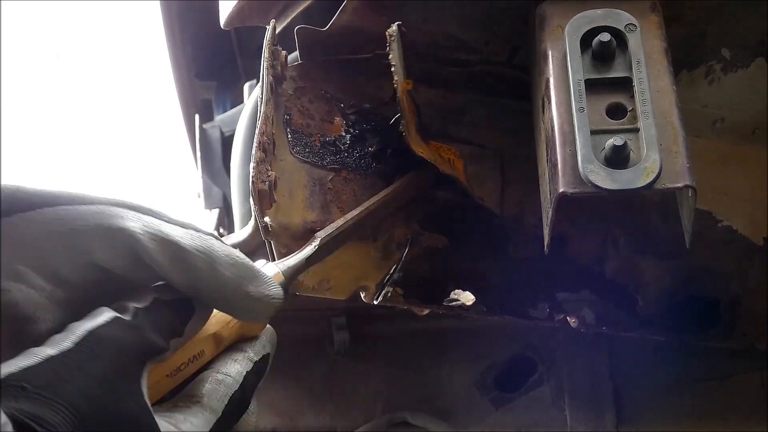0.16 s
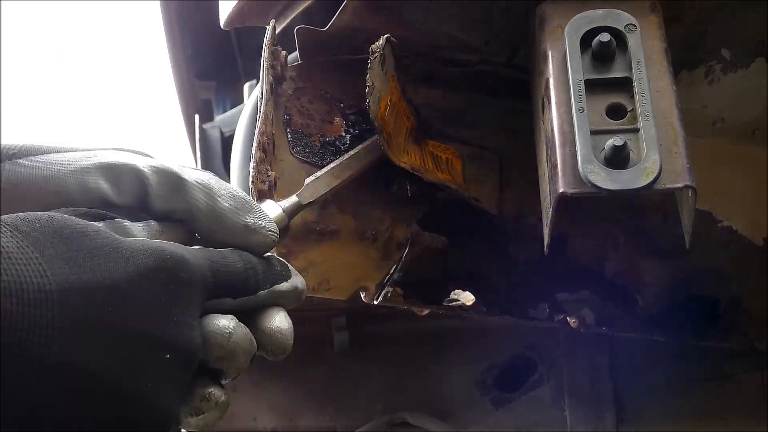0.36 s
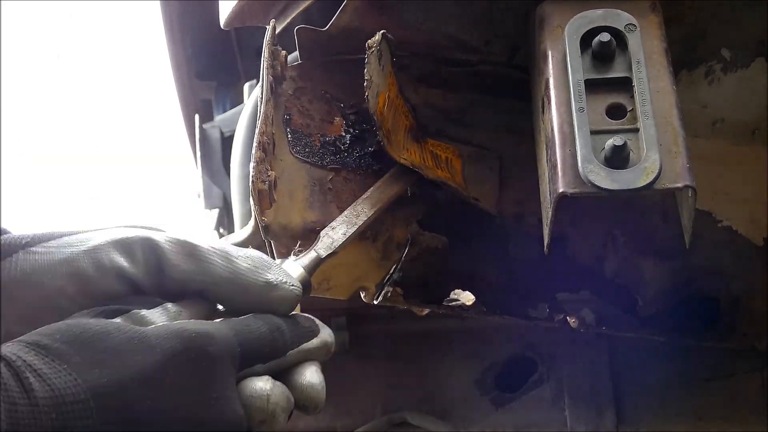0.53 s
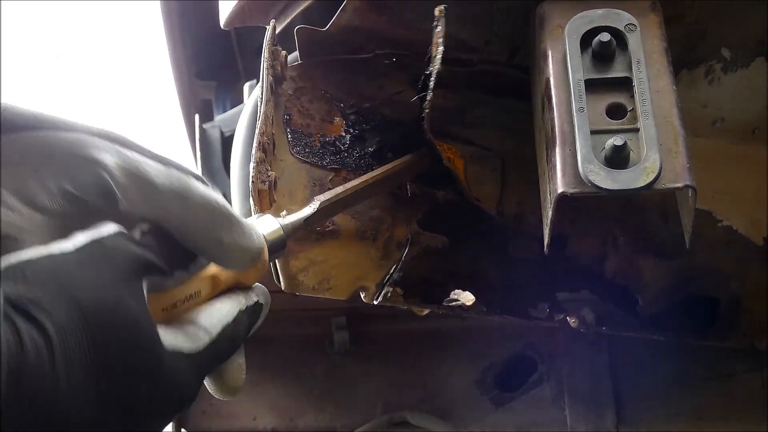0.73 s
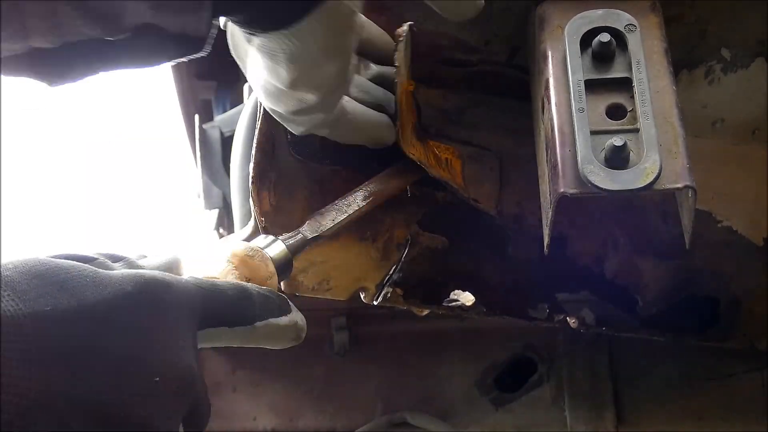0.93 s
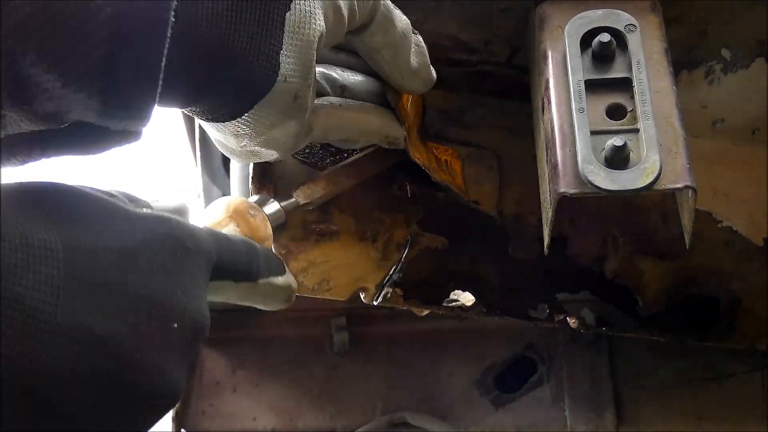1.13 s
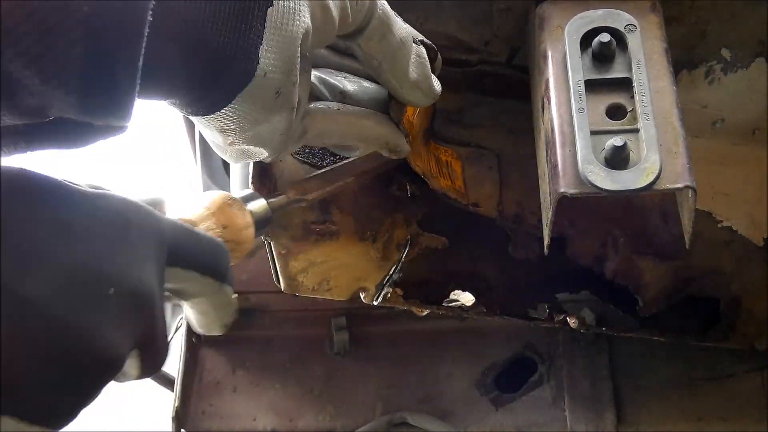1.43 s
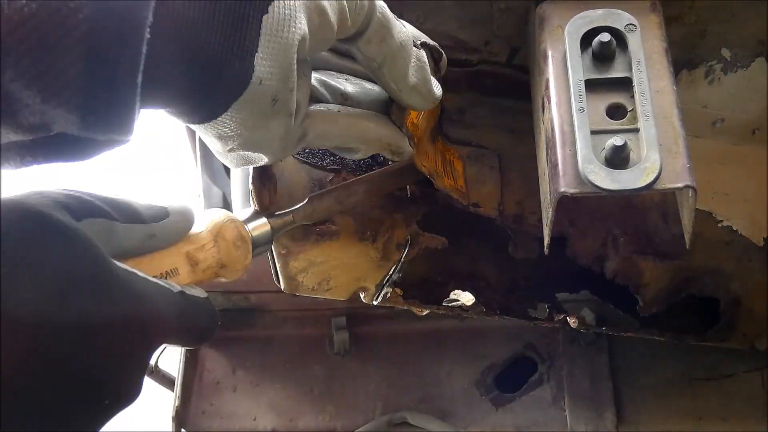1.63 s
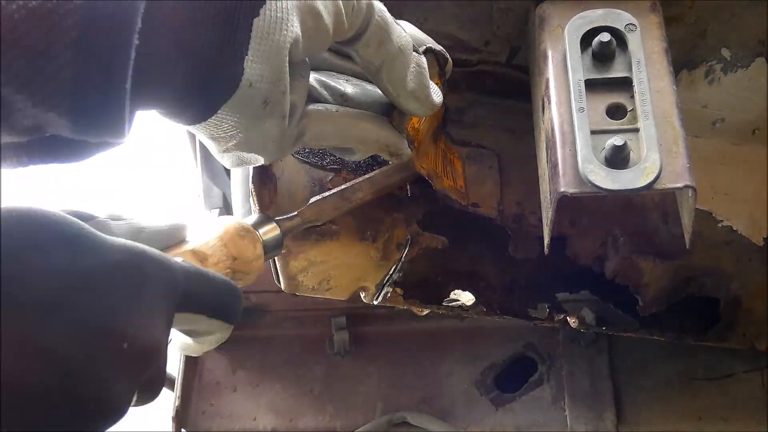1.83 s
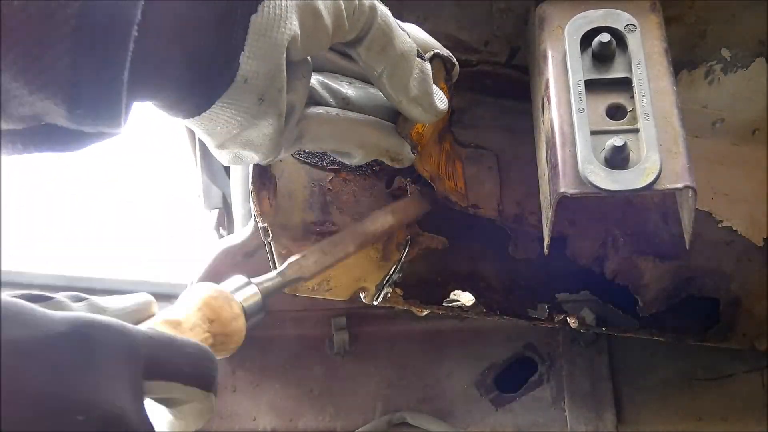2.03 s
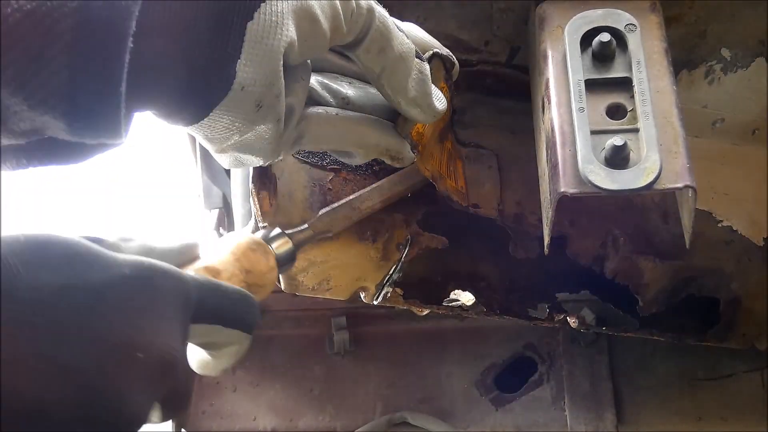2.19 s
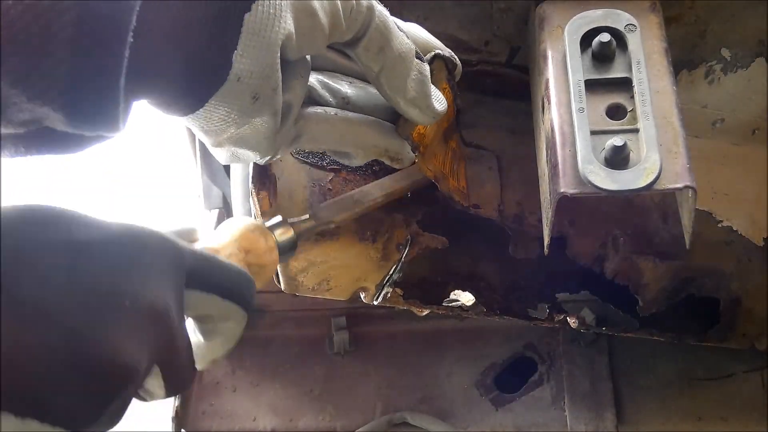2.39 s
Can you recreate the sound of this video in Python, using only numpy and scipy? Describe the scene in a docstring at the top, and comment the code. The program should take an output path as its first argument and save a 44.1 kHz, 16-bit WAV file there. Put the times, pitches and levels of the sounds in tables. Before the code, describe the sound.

A steel blade scrapes rust from sheet metal under a car, an arm's length away. Gritty strokes and scattered snaps build to a louder crunching run with sharp clicks, then thin out, in a quiet workshop.

```python
"""A steel blade prises and scrapes rust off the sheet metal under a car, an arm's length away.
Flakes snap off singly and in crunching runs; each snap rings the blade and the dull, damped panel.
Between them the tip grinds through grit, clicks on bare steel and sings as it drags. Firmer pushes
knock the hollow sheet and a glove rubs the metal, over the faint rush of a quiet workshop."""
import sys
import numpy as np
from scipy import signal
from scipy.fft import rfft, irfft
from scipy.io import wavfile

SR = 44100
rng = np.random.default_rng(int(sys.argv[2]) if len(sys.argv) > 2 else 0)


def to_wav(sig):
    """Store sig (one row per channel, or 1-D mono) as 16-bit WAV at the path in sys.argv[1].

    Samples outside -1..1 are clipped; the rate is SR.
    """
    pcm = np.clip(np.atleast_2d(sig), -1, 1) * 32767
    pcm = np.round(pcm).astype(np.int16)
    wavfile.write(sys.argv[1], SR, pcm.T)  # frames by channels


N = 112454
TIME = np.arange(N) / SR
HIT_GAIN = np.sqrt(SR / 100)  # gives a unit-energy hit the energy of 10 ms at 0 dB
SIDEWAYS = np.array([[1], [-1]])  # plus on the left, minus on the right


def undb(db):
    """Decibels to gain."""
    return 10 ** (np.asarray(db) / 20)


def unit(x):
    """Scale to an energy of one."""
    return x / np.sqrt(np.sum(x ** 2) + 1e-18)


def level(x, db):
    """Scale to an rms level."""
    return x * undb(db) / np.sqrt(np.mean(x ** 2))


def band(x, lo_hz, hi_hz, order=3):
    """Causal band-pass."""
    return signal.sosfilt(signal.butter(order, [lo_hz, hi_hz], "band", fs=SR, output="sos"), x)


def dull(x, hz):
    """One-pole low-pass."""
    pole = np.exp(-2 * np.pi * hz / SR)
    return signal.lfilter([1 - pole], [1, -pole], x)


def ring(x, response):
    """Pass a signal through an impulse response."""
    return signal.fftconvolve(x, response)[:len(x)]


def decay(t, t60_s):
    """A tail that falls 60 dB in t60_s."""
    return np.exp(-np.log(1000) * t / t60_s)


def walk(per_s):
    """Smooth random wandering with a spread near one."""
    return 1.2 * np.interp(TIME * per_s, np.arange(2000), rng.standard_normal(2000))


def gate(start, length, ramp_s=0.01):
    """Opens for a stroke, with a short ramp at each end."""
    return np.clip(np.minimum(TIME - start, start + length - TIME) / ramp_s + 0.5, 0, 1)


def add(out, x, start_s):
    """Mix a sound in at a time."""
    i = max(int(start_s * SR), 0)
    out[i:i + len(x)] += x[:max(N - i, 0)]


# The colour of the room tone. Each row: frequency in Hz, relative level in dB.
ROOM_TONE = [(30, -34), (90, -22.5), (160, -16), (250, -5.5), (450, 1), (800, -1.5), (1500, 1.5),
             (2000, -9), (4500, -7), (5500, -12), (16000, -21)]
def workshop(bed_db=-50.5, side_db=-7, waver_db=2.16):
    """A faint, slightly wavering rush sits under everything."""
    hz, db = np.array(ROOM_TONE).T
    colour = undb(np.interp(np.log(np.fft.rfftfreq(N, 1 / SR) + 1), np.log(hz), db))
    mid, side = (level(irfft(rfft(rng.standard_normal(N)) * colour, N), bed_db) for _ in range(2))
    return (mid + undb(side_db) * side * SIDEWAYS) * undb(waver_db * walk(per_s=26))


def reflections(x, t60_s, fade_in_s=0.0018, size=20000):
    """Diffuse echoes build just behind the sound and die away."""
    t = np.arange(size) / SR
    tail = rng.standard_normal(size) * np.clip(t / fade_in_s, 0, 1) * decay(t, t60_s)
    return ring(x, unit(tail))


# The glove brushing the panel. Each row: start in seconds, length in seconds, peak level in dB.
GLOVE_RUBS = [(0.386, 0.076, -53.5), (0.887, 0.049, -48), (1.899, 0.036, -51.5)]
def glove():
    """Soft, low rubs of the gloved hand against the panel."""
    pressure = sum(undb(db) * np.sin(np.pi * np.clip((TIME - start) / length, 0, 1))
                   for start, length, db in GLOVE_RUBS)
    rub = band(rng.standard_normal(N), lo_hz=260, hi_hz=620)
    return pressure * level(rub, 0)


def struck_steel(modes, click_db, spread_db=3, size=6000):
    """Steel answers a tap with a click and decaying modes; each place of contact favours other modes."""
    t = np.arange(size) / SR
    tone = np.zeros(size)
    for hz, db, t60 in modes:
        gain = undb(db + spread_db * rng.uniform(-0.74, 1))
        tone += gain * unit(np.cos(2 * np.pi * hz * t) * decay(t, t60))
    return unit(tone) + undb(click_db) * (t == 0)


# The modes that sing. Each row: pitch in Hz, relative level in dB, 60 dB decay time in seconds.
SINGING_MODES = [(4657, 15, 0.018), (4700, -7, 0.032), (4790, -7, 0.076)]
# The drags that set them off. Each row: start in seconds, length in seconds, level in dB.
SINGING_DRAGS = [(0.082, 0.013, -40), (2.04, 0.0066, -27.5), (2.159, 0.012, -27.5), (2.211, 0.039, -42.5)]
def singing():
    """Friction keeps a close group of the blade's modes ringing."""
    friction = rng.standard_normal(N)
    tone = level(ring(friction, struck_steel(SINGING_MODES, click_db=-26)), 0)
    return tone * sum(undb(db) * gate(start, length) for start, length, db in SINGING_DRAGS)


# Hollow knocks. Each row: start in seconds, level in dB, pitch in Hz, 60 dB decay time in seconds.
SHEET_KNOCKS = [(1.11, -39, 967, 0.12), (1.535, -39, 947, 0.051), (2.264, -38.5, 517, 0.15),
                (2.468, -40, 517, 0.23)]
def knocks(size=6000):
    """A firmer push sets one hollow mode of the sheet swelling and ringing."""
    out, t = np.zeros(N), np.arange(size) / SR
    for start, db, hz, t60 in SHEET_KNOCKS:
        swell = 1 - np.exp(-(t * hz / 2) ** 2)
        tone = np.sin(2 * np.pi * hz * t) * decay(t, t60) * swell
        add(out, HIT_GAIN * undb(db) * unit(tone), start)
    return out


# Hard clicks. Each row: peak time in seconds, level in dB, pitch in Hz, attack in seconds.
TIP_CLICKS = [(0.022, -35.5, 1474, 0.0026), (0.039, -34, 4100, .0014), (0.4273, -34, 2200, 0.00096),
              (0.6416, -41.5, 4650, 0.0014), (1.1025, -38, 4390, 0.0016), (1.2415, -29, 3820, .0007),
              (1.467, -33, 3610, 0.00072), (1.8922, -26, 3530, 0.00073), (1.892, -25.5, 6640, .0003),
              (1.982, -29, 4060, .001), (1.9903, -23.5, 3900, .0008), (1.9951, -23.5, 3950, 0.001115),
              (2.122, -28.5, 4440, .001), (2.1298, -28, 5760, 0.00027), (2.309, -26.5, 4710, 0.0014),
              (2.4196, -35, 4690, 0.0011), (2.4686, -34.5, 3570, .0008)]
def clicks(size=1500):
    """The tip hits bare steel: a few cycles that swell and die at once."""
    out, t = np.zeros(N), np.arange(size) / SR
    for peak, db, hz, attack in TIP_CLICKS:
        envelope = (t / attack) ** 2 * np.exp(-2 * t / attack)
        burst = envelope * np.sin(2 * np.pi * (hz * t + rng.random()))
        add(out, HIT_GAIN * undb(db) * unit(burst), peak - attack)
    return out


# The dull panel's modes. Each row: pitch in Hz, relative level in dB, 60 dB decay time in seconds.
PANEL_MODES = [(517, 0.5, 0.075), (624.5, -1.5, 0.18), (947, 2, 0.034), (1036, -5, 0.055),
               (1273, -7.5, 0.028), (1516, 6.5, 0.045), (1606, -4, 0.038), (1808, 0.5, 0.053),
               (1995, -2, 0.045), (2176, 6, 0.0097), (2309, -3.5, 0.056), (2790, 0, 0.055),
               (2714, 0, 0.028)]
# The bright blade's modes. Each row: pitch in Hz, relative level in dB, 60 dB decay time in seconds.
BLADE_MODES = [(3098, -1, 0.044), (3374, 0, 0.015), (3526, -1, 0.026), (3910, -2, 0.034),
               (4100, 4.5, 0.025), (4130, -3.5, 0.0035), (4690, 5, 0.012), (4830, 4, 0.029),
               (5590, -6, 0.045), (6907, -3.5, 0.018), (7980, -3.5, 0.032), (9060, -7.5, 0.0088),
               (13500, 1, 0.0056)]
# The steel's four bands: thud, clank, ring, crack. Each row: low edge in Hz, high edge in Hz,
# decay time of a snap's scatter in seconds, scatter level in dB against the snap's first push.
STEEL_BANDS = [(417, 1356, 0.015, 18), (1150, 2580, 0.012, 12), (2855, 4730, 0.004, 12),
               (5240, 14500, 0.0057, 12)]
def contact_responses():
    """The steel's voice at one spot: thud and clank from the panel, ring and crack from the blade."""
    panel = struck_steel(PANEL_MODES, click_db=5)
    blade = struck_steel(BLADE_MODES, click_db=-1.5)
    sources = panel, panel, blade, dull(blade, hz=7400)
    return [unit(band(x, lo, hi)) for x, (lo, hi, _, _) in zip(sources, STEEL_BANDS)]


# Strokes through grit. Each row: start in seconds, length in seconds, push on the blade in dB,
# push on the panel in dB against that on the blade.
GRIT_STROKES = [(0.025, 0.045, -32, -3), (0.086, 0.017, -32, 0.5), (0.098, 0.077, -46, 0),
                (0.192, 0.064, -41.5, -8), (0.268, 0.05, -45, 5.5), (0.331, 0.046, -33.5, -7),
                (0.378, 0.037, -42.5, 7.5), (0.446, 0.022, -47, 1), (0.497, 0.047, -42, -5),
                (0.662, 0.036, -40.5, -1), (0.7, 0.049, -40, -1), (0.756, 0.06, -45.5, -1),
                (0.82, 0.043, -44, -19), (0.893, 0.065, -46, -22), (0.979, 0.034, -45.5, -13),
                (1.039, 0.056, -49, -7), (1.271, 0.086, -48, 3), (1.514, 0.0082, -36.5, 3),
                (1.663, 0.067, -44.5, -4), (1.717, 0.028, -35.5, -9), (1.862, 0.075, -45, 7),
                (1.939, 0.024, -37, 5.5), (2.037, 0.019, -30, -3), (2.074, 0.084, -35.5, -3.5),
                (2.16, 0.013, -27.5, -21), (2.207, 0.047, -44, -19), (2.256, 0.043, -32, -1),
                (2.384, 0.024, -41, -17), (2.476, 0.039, -42.5, -1)]
# The tone of the grind: one gain in dB each for thud, clank, ring and crack.
GRIT_BAND_DB = [-13.5, -12, -9.5, -9]
def scraping(responses, grains_per_s=3700, spread_db=2, judder_db=3.5, touch_db=-60, waver_db=3):
    """The tip catches on dense, uneven grit, lightly all the time and harder in each stroke."""
    blade_push = panel_push = undb(touch_db + waver_db * walk(per_s=45))
    for start, length, db, panel_db in GRIT_STROKES:
        stroke = undb(db) * gate(start, length)
        blade_push = blade_push + stroke
        panel_push = panel_push + stroke * undb(panel_db)
    catches = (rng.random(N) < grains_per_s / SR) * np.sign(rng.standard_normal(N))
    grain_size = undb(spread_db * np.minimum(rng.exponential(size=N), 3))
    judder = undb(judder_db * walk(per_s=130))
    grit = level(catches * grain_size * judder, 0)
    pushes = panel_push, panel_push, blade_push, blade_push
    return sum(undb(db) * ring(grit * push, response)
               for db, push, response in zip(GRIT_BAND_DB, pushes, responses))


# Rust letting go. Each row: start in seconds, then levels in dB of the panel's thud, the panel's
# clank, the blade's ring and the crack.
RUST_SNAPS = [(0.02, -42.5, -41.5, -39, -34.5), (0.038, -42, -39, -30.5, -35),
              (0.051, -44.5, -42.5, -33.5, -43), (0.0592, -40.5, -61, -34, -38),
              (0.286, -43, -64, -41, -40), (0.342, -55, -37, -36, -33.5), (0.3453, -54, -43, -29, -32),
              (0.3593, -43, -42, -24, -29.5), (0.426, -37, -34.5, -33.5, -38),
              (0.5128, -35, -41, -24.5, -33), (0.519, -37, -41, -32, -36), (0.642, -51, -54, -49, -44.5),
              (0.897, -62, -62, -48, -47), (0.972, -72, -68, -62, -41.5), (1.044, -52, -45.5, -51, -49),
              (1.061, -42.5, -64, -39.5, -51), (1.1, -42.5, -43, -35.5, -41),
              (1.111, -36, -38, -33.5, -38.5), (1.2402, -43, -30.5, -30, -43),
              (1.368, -63, -49, -45.5, -47), (1.4662, -43, -36, -37.5, -46.5), (1.526, -51, -34, -42, -46),
              (1.535, -36, -36.5, -25, -40), (1.7044, -49, -36, -41.5, -42), (1.7283, -60, -37, -26.5, -31),
              (1.736, -52, -38, -31, -39), (1.771, -44.5, -39, -35, -36), (1.775, -46, -46, -32, -35.5),
              (1.8909, -38.5, -30, -21.5, -27), (1.959, -57, -33.5, -25.5, -34.5),
              (1.9699, -53, -33, -33, -36), (1.9775, -62, -32.5, -23, -29), (1.984, -50, -31.5, -25, -29),
              (1.989, -48, -29, -24, -30.5), (1.9962, -49, -33.5, -26.5, -32.5),
              (2.022, -48.5, -41.5, -45, -43), (2.0425, -45, -32.5, -33, -32.5),
              (2.0983, -37.5, -40.5, -26.5, -37.5), (2.12, -38, -30, -27, -30),
              (2.1294, -47, -31, -28, -26.5), (2.1365, -42, -40, -27.5, -32),
              (2.141, -40, -44, -26.5, -30.5), (2.1706, -41.5, -51, -31.5, -37.5),
              (2.203, -56, -50, -39.5, -40), (2.2635, -40.5, -40, -32, -39),
              (2.3082, -47, -37, -35.5, -25.5), (2.394, -49, -40.5, -48, -48),
              (2.42, -49, -42.5, -43, -48.5), (2.468, -37.5, -37.5, -32, -44),
              (2.532, -39, -38.5, -37.5, -48.5)]
def snaps(spots, first_push=1, rough_db=5.5, low_thump_db=-43.5, size=6000):
    """Each flake gives one sharp push, then a dying scatter of splinters and bending waves."""
    out, t = np.zeros(N), np.arange(size) / SR
    for i, (start, *levels) in enumerate(RUST_SNAPS):
        responses = spots[i % len(spots)]
        for db, response, (_, _, scatter_s, scatter_db) in zip(levels, responses, STEEL_BANDS):
            splinters, roughness = rng.standard_normal((2, size))
            envelope = np.exp(-(t / scatter_s) ** 1.26)  # a power above 1 holds, then stops short
            scatter = unit(splinters * undb(rough_db * roughness) * envelope)
            force = first_push * (t == 0) + undb(scatter_db) * scatter
            add(out, HIT_GAIN * undb(db) * unit(ring(force, response)), start)
        # a very faint low thump under each crack
        low_thump = band(scatter, lo_hz=20, hi_hz=91, order=2)
        add(out, HIT_GAIN * undb(levels[-1] + low_thump_db) * unit(low_thump), start)
    return out


def scene(spot_count=5, near_db=-13, side_db=-10, room_db=-19.5, lean_right_db=1.1):
    """The work is heard directly, scattered sideways by the bodywork, and off the workshop's walls."""
    spots = [contact_responses() for _ in range(spot_count)]
    accents = clicks() + knocks() + singing() + glove()
    direct = snaps(spots) + scraping(spots[0]) + accents
    near = undb(near_db) * reflections(direct, t60_s=0.085)
    scattered = snaps(spots, first_push=0) + scraping(spots[0]) + reflections(accents, t60_s=0.053)
    side = undb(side_db) * scattered * SIDEWAYS
    damped = dull(direct, hz=3450)
    room = undb(room_db) * np.array([reflections(damped, t60_s=0.61) for _ in range(2)])
    balance = undb(-lean_right_db / 2 * SIDEWAYS)
    return (direct + near + side + room) * balance + workshop()


def record(dry, top_hz=16100):
    """A steep low-pass trims the very top."""
    return signal.sosfilt(signal.ellip(8, 0.2, 70, top_hz, fs=SR, output="sos"), dry)


dry = scene()
out = record(dry)
to_wav(out)
```